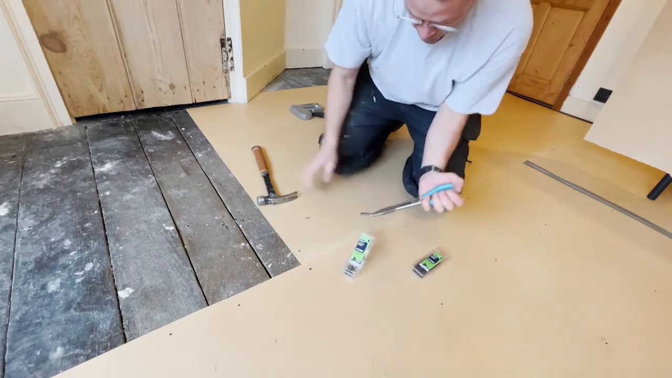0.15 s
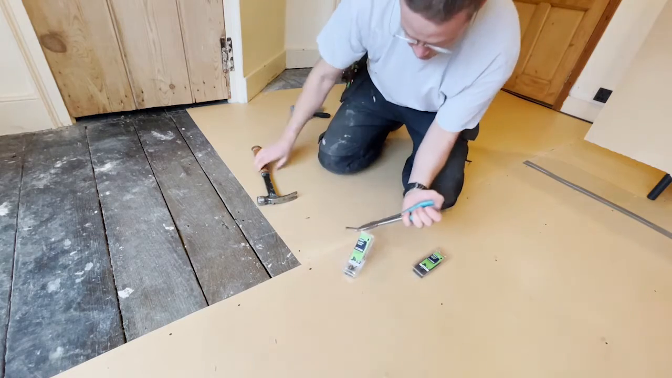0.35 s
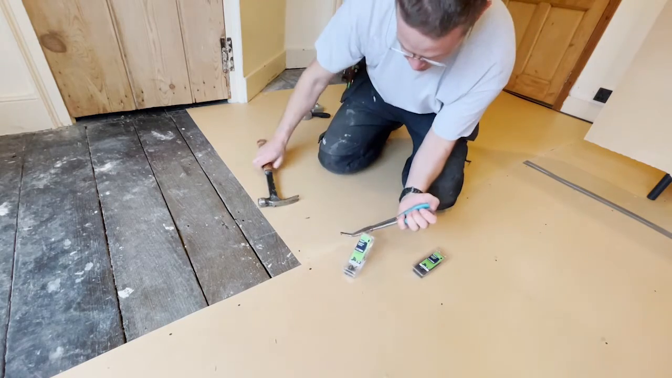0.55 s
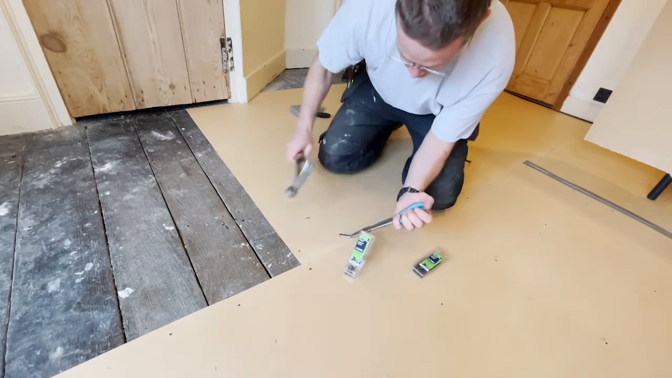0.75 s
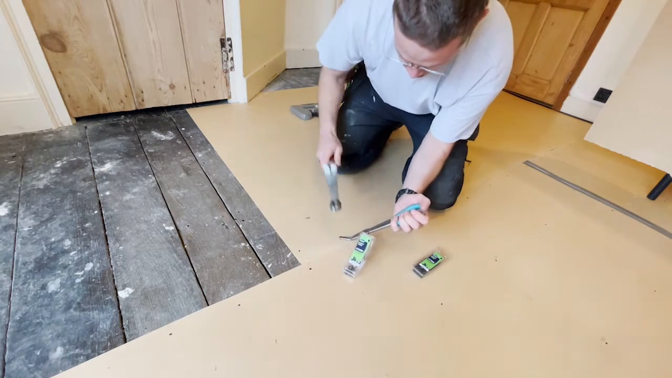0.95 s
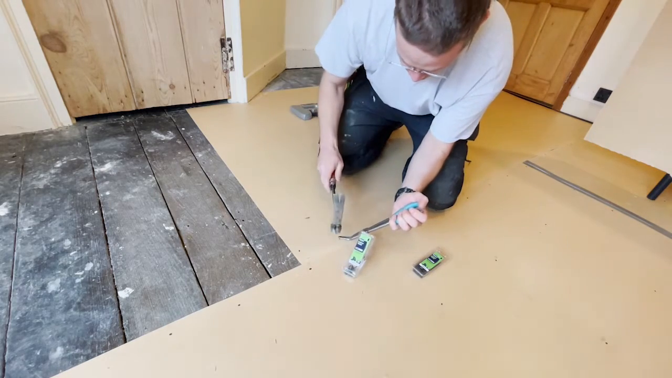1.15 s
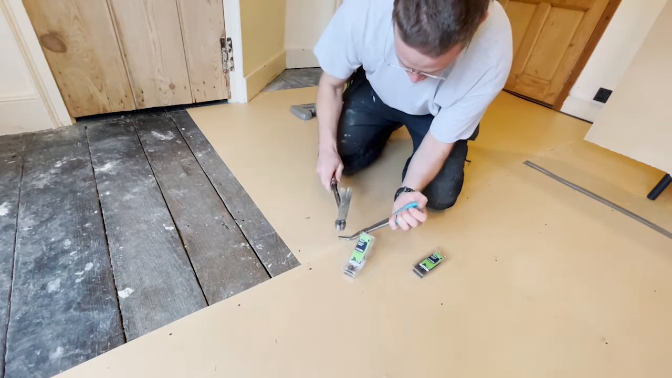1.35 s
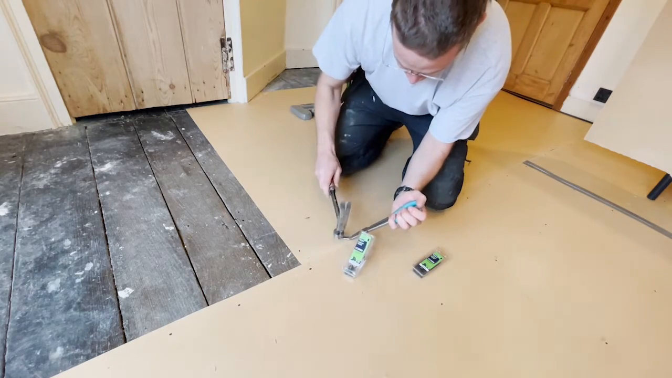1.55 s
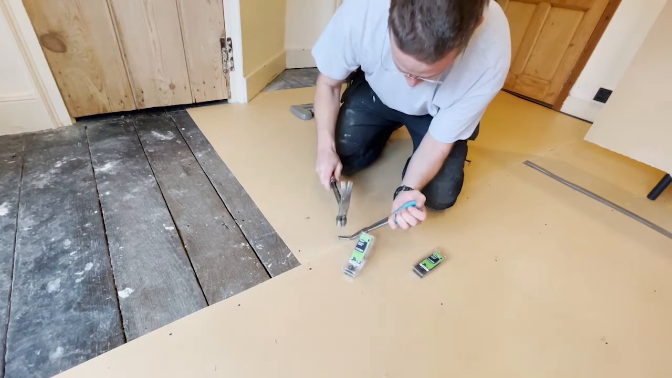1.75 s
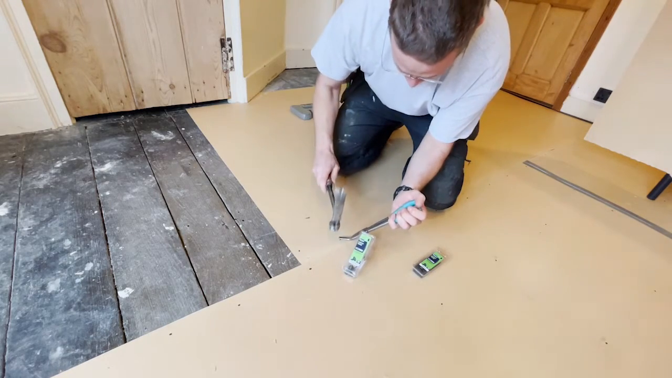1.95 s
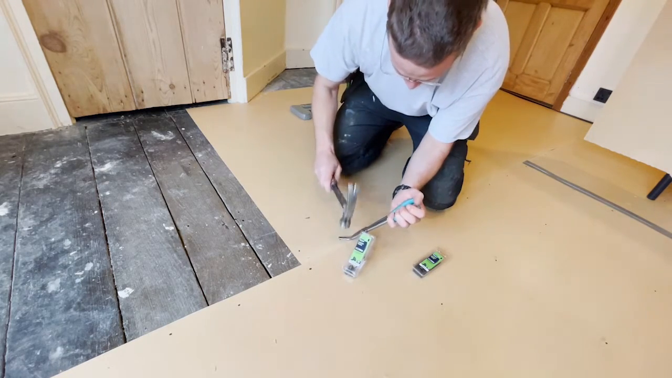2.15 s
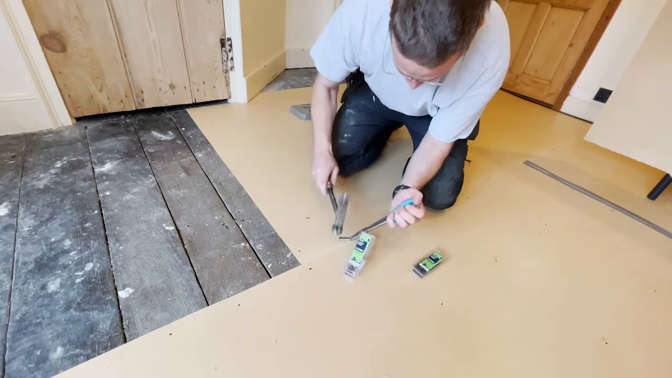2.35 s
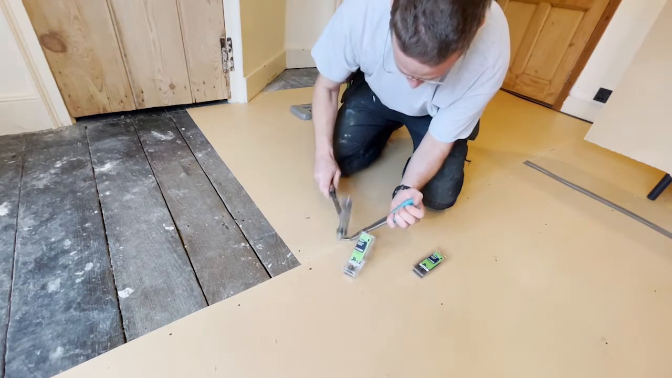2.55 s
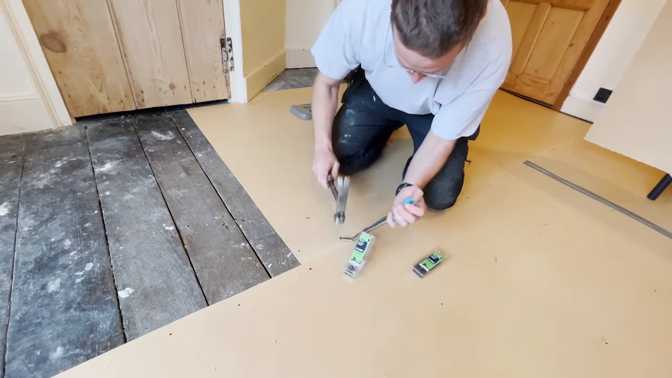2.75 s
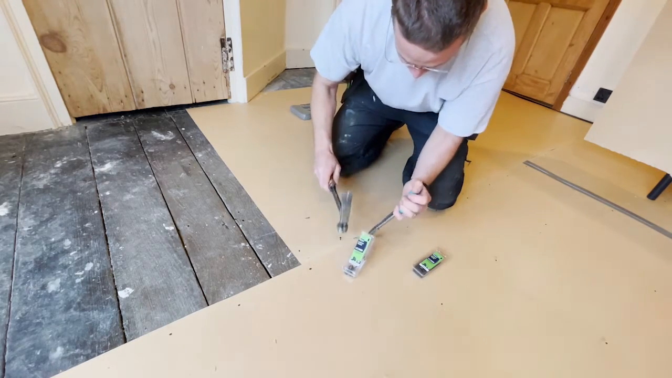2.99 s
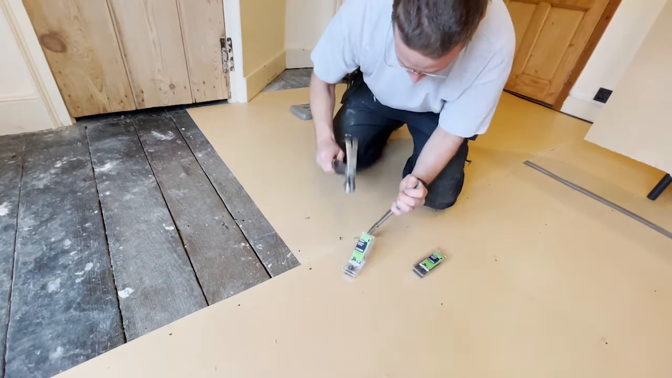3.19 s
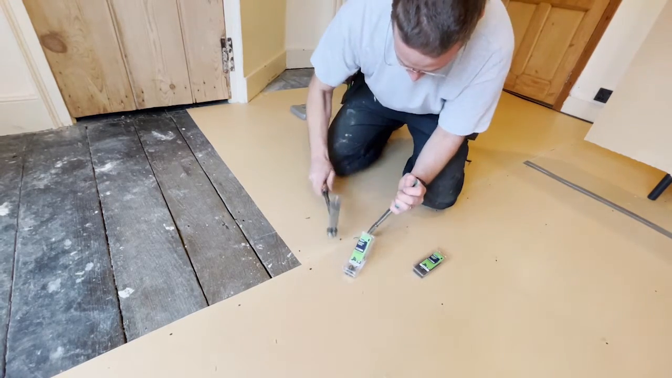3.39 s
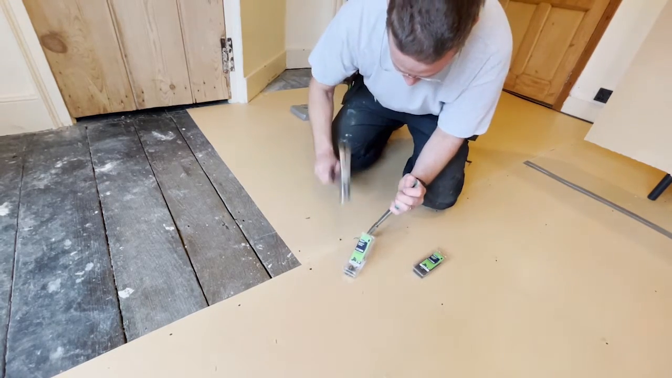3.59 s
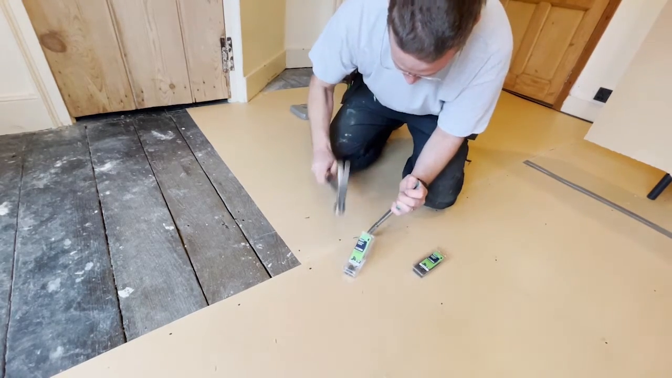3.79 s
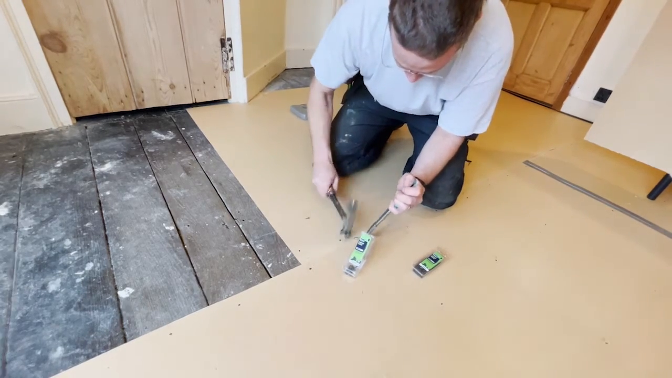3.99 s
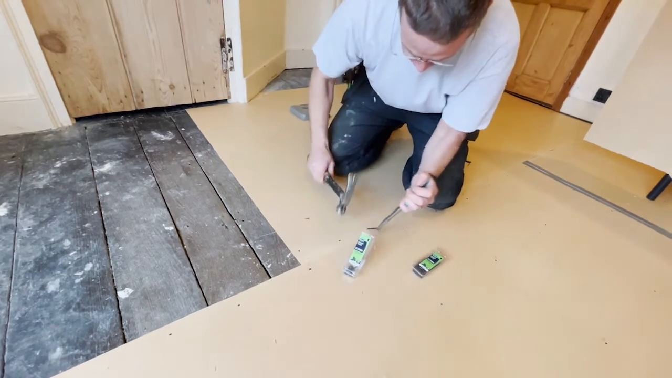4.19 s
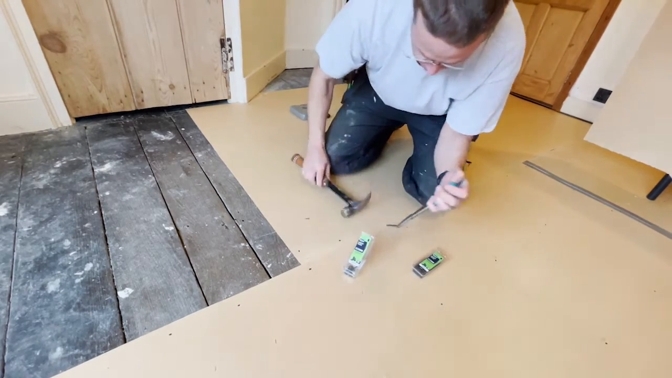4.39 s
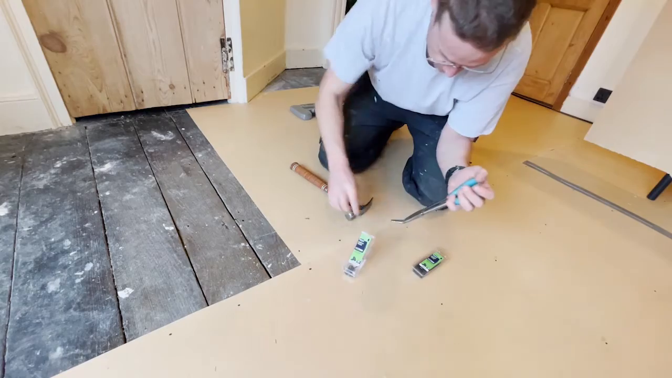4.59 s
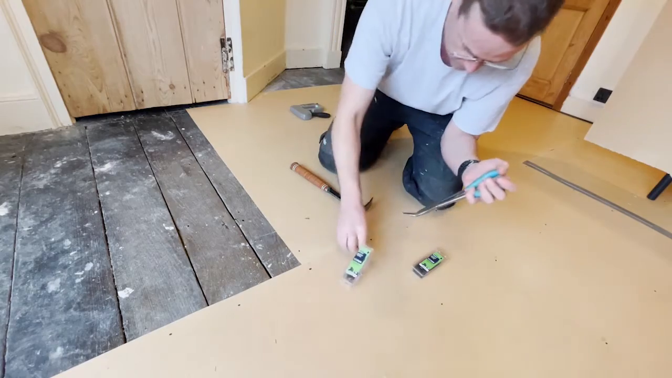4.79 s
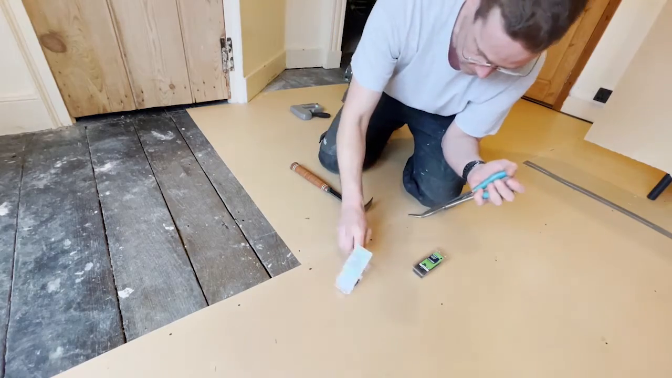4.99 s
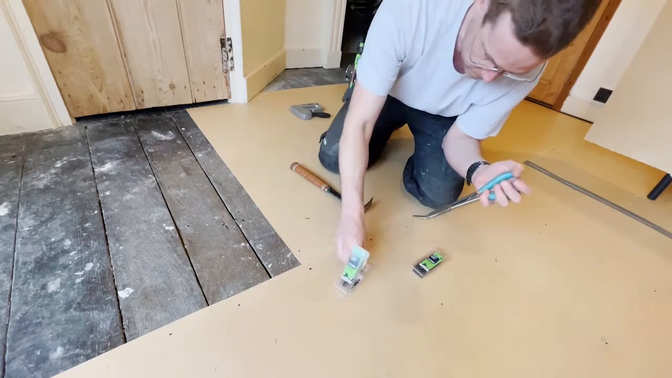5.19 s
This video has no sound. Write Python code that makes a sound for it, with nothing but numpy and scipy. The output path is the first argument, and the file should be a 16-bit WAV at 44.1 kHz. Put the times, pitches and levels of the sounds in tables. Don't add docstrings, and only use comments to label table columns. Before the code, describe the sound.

A quiet bare room with a low, steady air noise. From 0 to about 1.3 s there is very faint clothing rustle, with deep soft floor movements as knees shift until about 1.7 s; small steel chinks and a slight scuff come as a hammer is picked up around 0.3-0.6 s, with another chink near 0.95 s. After a still pause, a light tap lands at 1.8 s, firmer ones at 2.2 and 2.6 s, and a weak glancing tick at 2.9 s. Three hard blows follow at 3.3, 3.6 and 3.9 s, each louder, the last harsh and clipped. Each is a sharp board knock with bright steel attack, low thud, hollow hum around 350 Hz and a live room tail. At 4.3-4.5 s the hammer is laid down with woody knocks and clacks. From 4.7 s to the end, tacks rattle in a small thin box in short dry bursts.

```python
import sys
import numpy as np
from scipy import signal
from scipy.io import wavfile
from scipy.ndimage import uniform_filter1d

SR = 44100
rng = np.random.default_rng(int(sys.argv[2]) if len(sys.argv) > 2 else 0)


def magnitude_from_level(level_db):
    exponent = np.asarray(level_db, float) / 20
    return 10 ** exponent


def generate_wav(sig):
    pcm = np.round(np.clip(np.atleast_2d(sig).T, -1, 1) * 32767).astype(np.int16)
    wavfile.write(sys.argv[1], SR, pcm)


N = 231001
T = np.arange(N) / SR


def evened(x):
    return x / np.sqrt(np.mean(x ** 2) + 1e-20)


def read(points, hz):
    f, value = np.transpose(points)
    return np.interp(np.log(hz + 1), np.log(f + 1), value)


def add(mix, start_s, sound):
    part = mix[round(start_s * SR):][:len(sound)]
    part += sound[:len(part)]


def coloured(x, points, size=8192):
    gain_db = np.maximum(read(points, abs(np.fft.fftfreq(size, 1 / SR))), -100)
    spectrum = np.conj(np.exp(signal.hilbert(np.log(magnitude_from_level(gain_db)))))
    taps = np.fft.ifft(spectrum).real[:size // 2]
    return signal.oaconvolve(x, taps / np.linalg.norm(taps))[:len(x)]


def ringing(x, modes):
    t = np.arange(SR) / SR
    answer = sum(magnitude_from_level(db - 60 * t / t60_s) * np.sin(2 * np.pi * hz * t) for hz, db, t60_s in modes)
    return signal.oaconvolve(x, answer)[:N]


def gestures(rows, rise_db_per_s, fall_db_per_s):
    power = np.zeros(N)
    for start_s, hold_s, db in rows:
        rise_db = rise_db_per_s * np.maximum(start_s - T, 0)
        fall_db = fall_db_per_s * np.maximum(T - start_s - hold_s, 0)
        power += magnitude_from_level(db - rise_db - fall_db) ** 2
    return np.sqrt(power)


# pitch_hz, density_db_per_hz
AIR_COLOUR = [(24, -28), (40, -23), (54, -6), (91, -9.5), (114, -12.5), (397, -24), (722, -33), (2770, -31),
              (3840, -27), (5580, -37.5), (11500, -38), (13500, -41.5)]


def still_air():
    return magnitude_from_level(-75.5) * coloured(rng.standard_normal(N), AIR_COLOUR, size=32768)


# start_s, hold_s, level_db
MOVES = [
    (0, 0.16, -61),
    (.4, 0.15, -59),
    (.9, .2, -69),
]
# start_s, hold_s, level_db
KNEES = [
    (0, 0.14, -43.5),
    (.26, .03, -51),
    (.5, 0.34, -54),
    (1.05, .005, -58),
    (1.18, 0.047, -55),
    (1.376, 0.035, -57),
    (1.48, 0.11, -61),
    (1.68, 0.017, -56.5),
]
# pitch_hz, density_db_per_hz
CLOTH = [(29, -35), (50, 5.5), (87, -9), (140, -8), (204, -12), (362, -6.5), (460, -3), (557, -10.5),
         (742, -10), (1040, -11), (1410, -8), (3940, -18), (4440, -19.5), (8260, -24), (15000, -36.5)]


def rustle():
    freeze_db = 60 * np.maximum(T - 1.34, 0)
    moving = gestures(MOVES, rise_db_per_s=53, fall_db_per_s=54) * magnitude_from_level(-freeze_db)
    grain = magnitude_from_level(0.78 * evened(uniform_filter1d(rng.standard_normal(N), 300)))
    cloth = moving * coloured(grain * rng.standard_normal(N), CLOTH)
    wander = evened(uniform_filter1d(rng.standard_normal(N), 4000))
    sway_hz = 24.0 + 1.6 * wander
    sway = np.sin(2 * np.pi * np.cumsum(sway_hz) / SR)
    return cloth + gestures(KNEES, rise_db_per_s=300, fall_db_per_s=198) * magnitude_from_level(-3.5) * sway


# start_s, pitch_hz, level_db
LIFTER = [
    (0.418, 1430, -68),
    (.545, 4030, -62),
    (.615, 2140, -62),
    (.96, 1530, -61.5),
    (.96, 3080, -69),
    (.1, 1870, -70),
    (.12, 3470, -78),
]
# start_s, pitch_hz, level_db, room_send_db
SPOTS = [(0.955, 900, -48.5, -10), (1.824, 4060, -21.5, -13), (2.206, 940, -7.5, -14),
         (2.207, 3470, -18.5, 0.5), (2.572, 668, -11.5, -4.5), (2.57, 2310, -23, -26),
         (2.926, 2070, -26.5, -5.5), (2.938, 6450, -48.5, 8), (3.3122, 487, -6.5, -0.5),
         (3.3122, 3030, -28, -20), (3.3122, 8200, -23, -10), (3.6286, 8200, -12, -16),
         (.955, 412, -60.5, 8.5), (3.629, 800, -5.5, 6.5), (3.918, 718, 7.5, -1), (3.918, 318, -5, 4.5),
         (3.918, 1066, 6, 4.5), (3.918, 1530, 0.5, 8), (3.918, 2026, 5.5, 2), (4.335, 184, -22, 1.5),
         (4.334, 445, -19.5, -16), (4.418, 202, -9, -10), (4.4245, 750, -7, -11), (4.423, 8500, -28, -11),
         (4.532, 4850, -24, -4), (4.76, 4570, -21, -9), (4.952, 5630, -24, 0)]
# start_s, pitch_hz, level_db, room_send_db
HEAD = [
    (2.206, 7500, -41, 7),
    (2.925, 5870, -38, -14),
    (2.925, 8620, -54, -11),
    (3.6295, 714, 1.5, -13.5),
]


def spots():
    near, sent, t = np.zeros(N), np.zeros(N), np.arange(4000) / SR
    rings = [(*row, 16.1 / row[1]) for row in SPOTS]
    rings += [(*row, 46 / row[1]) for row in HEAD]
    rings += [(*row, -5, 0.075) for row in LIFTER]  # room_send_db, t60_s
    for start_s, hz, db, send_db, t60_s in rings:
        onset = np.minimum(t * hz / 0.78, 1)
        ring = magnitude_from_level(db + 1.13 - 60 * t / t60_s) * np.sin(2 * np.pi * hz * t) * onset
        add(near, start_s, ring)
        add(sent, start_s, magnitude_from_level(send_db) * ring)
    return near, sent


# start_s, knock_db, tick_db, thud_db
KNOCKS = [(0.331, -73, -72, -63), (0.418, -58, -61, -55), (0.554, -57, -64, -64.5), (0.624, -67, -63, -86),
          (0.952, -64, -83, -59), (4.3343, -18.5, -41, -45), (4.4177, -7.5, -22, -21.5),
          (4.449, -25, -20, -26), (4.4516, -18, -33, -26.5), (4.531, -22, -31, -29.5),
          (4.673, -41, -37, -71.5), (4.733, -42, -31, -62), (4.9048, -29.5, -33, -53)]
# start_s, knock_db, tick_db, thud_db, sway_db
BLOWS = [
    (1.825, -20, -26.5, -35, -31.5),
    (2.2057, -12, -18.5, -30, -31.5),
    (2.571, -11.5, -21.5, -26.5, -31),
    (2.9248, -32, -54, -39.5, -53.5),
    (3.3122, -6.5, -9.5, -22.5, -21.5),
    (3.6287, 0, -10, -11.5, -20),
    (3.918, 8, -2, -7.5, -24.5),
]


def contacts():
    blows = [(start_s, knock, 0.91 * knock - 3.5, tick, thud, sway)
             for start_s, knock, tick, thud, sway in BLOWS]
    light = [(start_s, knock, knock - 7, tick, thud, thud - 18)
             for start_s, knock, tick, thud in KNOCKS]
    return blows + light


# pitch_hz, density_db_per_hz
BOARD = [(350, -17), (600, 0), (806, 0.5), (843, 0.5), (1270, -0.5), (1610, -5), (1860, -6.5), (2770, -13),
         (5920, -25.5), (9000, -29), (11700, -59.5), (19800, -120)]
# pitch_hz, density_db_per_hz
BODY = [(200, -54.5), (290, -12.5), (340, 5.5), (380, 1.5), (480, -3.5), (620, -6), (1000, -41),
        (9000, -70.5)]
# pitch_hz, density_db_per_hz
STEEL = [(1500, -19.5), (2500, 8.5), (4000, 4.5), (6000, 3.5), (8000, 2), (10300, -5), (12500, -3),
         (14500, -4), (15800, -6), (17000, -59)]
# pitch_hz, density_db_per_hz
THUD = [(35, -31.5), (50, 4.5), (65, -11), (90, -2), (122, 0), (165, 0.5), (200, -6.5), (280, 0.5),
        (450, -37), (9000, -65.5)]
# pitch_hz, level_db, t60_s
PANELS = [(242, -13.5, 0.096), (369, 2, 0.56), (398, 12.5, 0.32), (460, -11, 0.74), (472, -4, 1),
          (673, -7, 1), (790, -13, 0.25), (960, -13.5, 0.32), (1230, -15, 0.4), (1309, 0.5, 0.75)]
# pitch_hz, level_db, t60_s
FLOORBOARDS = [(47, -9.5, 0.45), (81.7, -11.5, 0.75), (124.4, -1.5, 0.28), (237, 0.5, 0.18)]
# pitch_hz, signed_share, t60_s
JOISTS = [(28.7, 0.55, 1.52), (32.4, -0.76, 1.4), (42, -0.61, 0.37), (20.725, -0.093, .8)]


def strikes(events):
    push, chatter, sway = np.zeros((4, N)), np.zeros((4, N)), np.zeros(N)
    t = np.arange(SR) / SR
    chatters = [(0.003, 0.1), (0.0013, 0.21), (0.0017, 0.35), (0.0087, 0.028)]  # decay_s, share
    for (start_s, *dbs, sway_db), chance in zip(events, rng.standard_normal((len(events), 4, 900))):
        for k, (decay_s, share) in enumerate(chatters):
            add(push[k], start_s, magnitude_from_level(dbs[k]) * np.ones(1))
            add(chatter[k], start_s, magnitude_from_level(dbs[k]) * share * chance[k] * np.exp(-t[:900] / decay_s))
        pitch = 1.02 - 0.63 * magnitude_from_level(sway_db)
        swing = sum(share * np.sin(2 * np.pi * hz * pitch * t) * magnitude_from_level(-60 * t / t60_s)
                    for hz, share, t60_s in JOISTS)
        add(sway, start_s, magnitude_from_level(sway_db) * swing)
    panels = magnitude_from_level(-22.5) * ringing(push[1], PANELS)
    boards = magnitude_from_level(-5.0) * ringing(push[3], FLOORBOARDS)
    parts = list(zip([BOARD, BODY, STEEL, THUD], magnitude_from_level(np.array([14.86, 16.7, 8.5, 23.8]))))
    drives = np.array([gain * coloured(x, colour) for x, (colour, gain) in zip(push, parts)])
    near = sum(gain * coloured(x, colour) for x, (colour, gain) in zip(chatter, parts))
    return near + drives[:3].sum(0), drives, sway + panels + boards + drives[3]


# start_s, hold_s, level_db
SLIDES = [
    (.36, .1, -76),
    (.5, 0.092, -73),
]
# pitch_hz, density_db_per_hz
GRIT = [(2000, -20), (5000, -1), (9000, -2), (14500, -3), (16000, -10)]


def slide():
    grain = magnitude_from_level(2.5 * evened(uniform_filter1d(rng.standard_normal(N), 200)))
    hiss = coloured(grain * rng.standard_normal(N), GRIT)
    return gestures(SLIDES, rise_db_per_s=200, fall_db_per_s=200) * hiss


# start_s, pitch_hz, level_db
HUMS = [
    (1.826, 442, -32.5),
    (1.826, 366, -43),
    (2.205, 372.5, -35),
    (2.571, 391.6, -30),
    (2.572, 471, -25),
    (3.3125, 350, -23.5),
    (3.629, 354.6, -17.5),
    (3.918, 348, -11),
]


def hums():
    out, t = np.zeros(N), np.arange(SR) / SR
    for start_s, hz, db in HUMS:
        swell = 1 - np.exp(-t / 0.012)
        add(out, start_s, magnitude_from_level(db - 60 * t / 0.76) * swell * np.sin(2 * np.pi * hz * t))
    return out


# peak_s, level_db, swell_and_fade_db_per_s
RATTLE = [
    (4.75, -22.5, 232),
    (4.913, -21.5, 1400),
    (4.952, -29, 698),
    (4.686, -38, 700),
    (4.786, -32, 1500),
]
# pitch_hz, density_db_per_hz
BOX = [(240, -30), (400, -15), (806, -3), (899, -37), (1170, 11.5), (1480, 2.5), (1650, 10.5), (7940, -3.5),
       (14800, -19), (15700, -35), (16500, -50)]


def rattle():
    size = magnitude_from_level(5.1 * np.minimum(rng.exponential(1, N), 4))
    hits = rng.random(N) < 1600 / SR
    clicks = size * rng.choice([-1., 1.], N) * hits
    stirred = sum(magnitude_from_level(db - db_per_s * abs(T - peak_s)) for peak_s, db, db_per_s in RATTLE)
    return stirred * magnitude_from_level(-13) * coloured(evened(clicks), BOX)


# delay_s, gain
ECHOES = [(0, 1.1), (.0021, 0.47), (.0054, -0.88), (.0076, 0.38), (0.0113, .25), (0.017, -0.33),
          (0.0298, 0.17)]


def early(x):
    answer = np.zeros(2000)
    for delay_s, gain in ECHOES:
        add(answer, delay_s, np.array([gain]))
    return signal.oaconvolve(x, answer)[:N]


# pitch_hz, t60_s
ROOM = [(60, 0.39), (120, 0.29), (200, 0.45), (290, 0.53), (345, 0.7), (460, 0.79), (1210, 0.83),
        (3200, 0.77), (6000, 0.71), (9000, 0.58), (15000, 0.37)]


def tail(x, tail_db, build_s=0.0039):
    taps = np.zeros(2 * SR)
    at = np.arange(0, 2 * SR - 10, 10)
    taps[at + rng.integers(0, 10, len(at))] = rng.choice([-1., 1.], len(at))
    hz, t, z = signal.stft(taps, SR, nperseg=2048, noverlap=1536)
    fading = z * magnitude_from_level(-60 * t / read(ROOM, hz)[:, None])
    answer = signal.istft(fading, SR, nperseg=2048, noverlap=1536)[1]
    answer = answer * (1 - np.exp(-np.arange(len(answer)) / SR / build_s))
    return signal.fftconvolve(x, magnitude_from_level(tail_db) * answer / np.linalg.norm(answer))[:N]


def scene():
    near, drives, floor = strikes(contacts())
    tacks = rattle()
    rings, sent = spots()
    wet_db = [4.94, 4.24, 6.3, 11.0, 3.6]
    late = sum(tail(x, db) for x, db in zip([*drives, tacks + sent], wet_db))
    struck = early(near + tacks) + rings + late + floor + hums()
    return (struck + rustle() + slide() + still_air())[None]


def low_pass(x):
    return signal.sosfilt(signal.butter(12, 16930, fs=SR, output="sos"), x)


def record(dry):
    power_db = 10 * np.log10(abs(uniform_filter1d(dry[0] ** 2, 400, origin=199)) + 1e-12)
    recovery_db = 71.0 * T
    peak_db = np.maximum.accumulate(power_db + recovery_db) - recovery_db
    over_db = np.maximum(peak_db - 1.0, 0)
    held = dry / magnitude_from_level(0.28 * uniform_filter1d(over_db, 300, origin=149))
    clipped = np.clip(held, -1.005, 1.005)
    edge = signal.firwin(255, 15900, window=("kaiser", 8), fs=SR)
    return low_pass(signal.oaconvolve(clipped, edge[None], "same"))


dry = scene()
out = record(dry)
generate_wav(out)
```